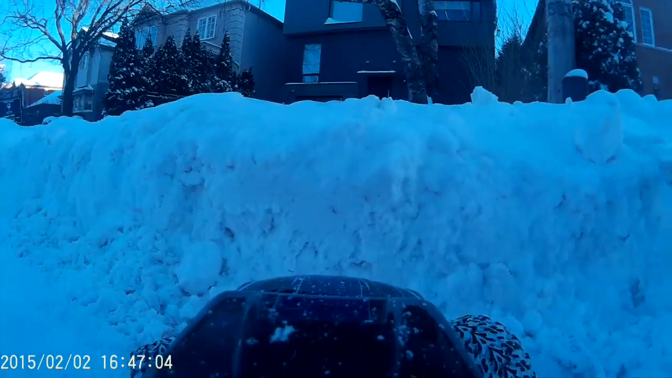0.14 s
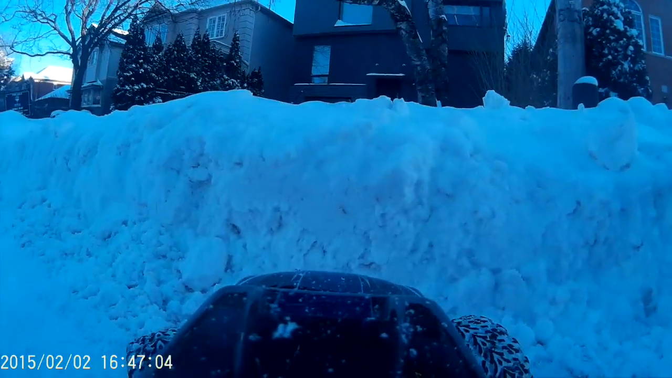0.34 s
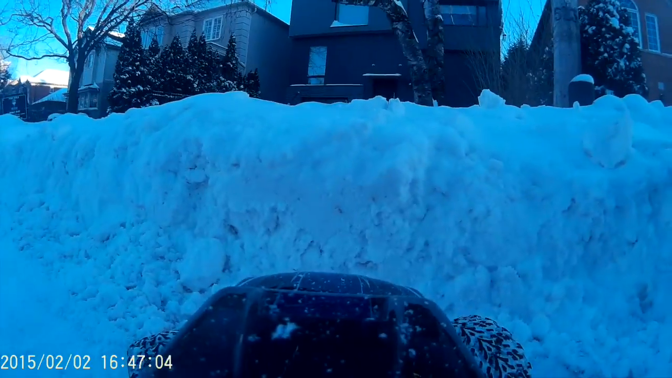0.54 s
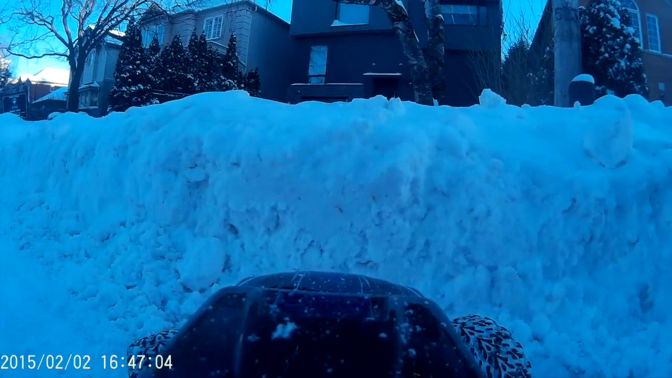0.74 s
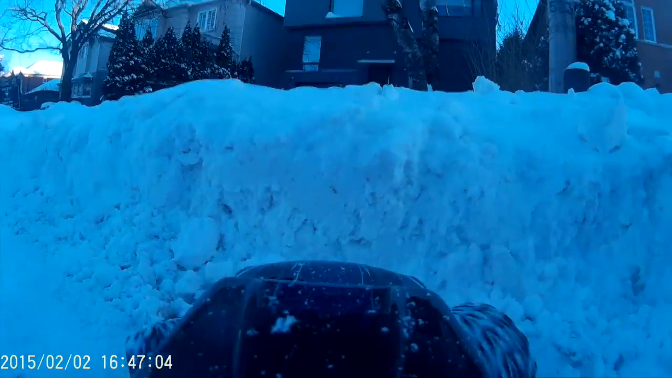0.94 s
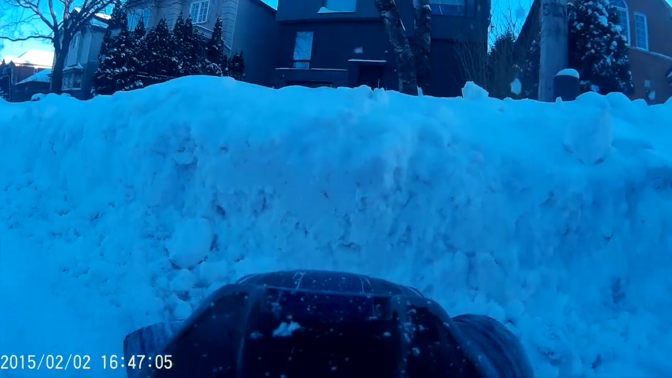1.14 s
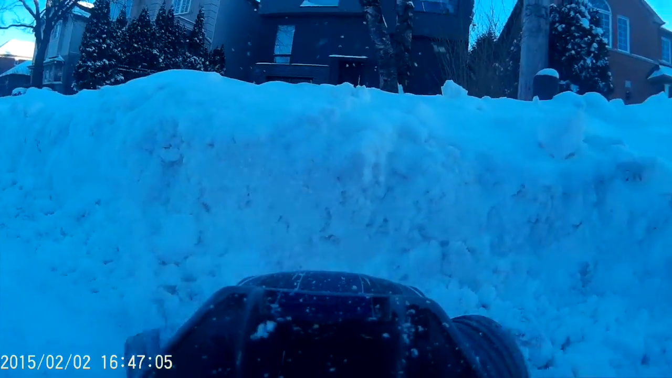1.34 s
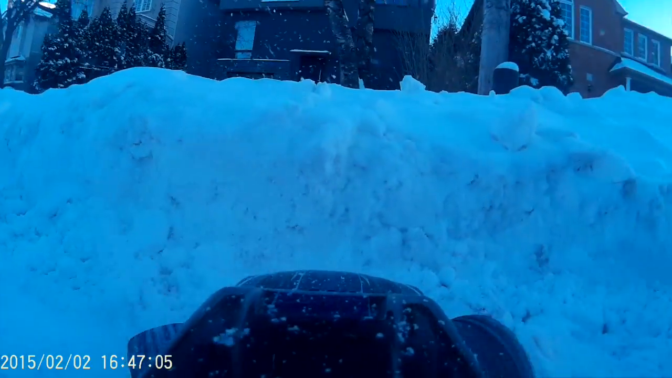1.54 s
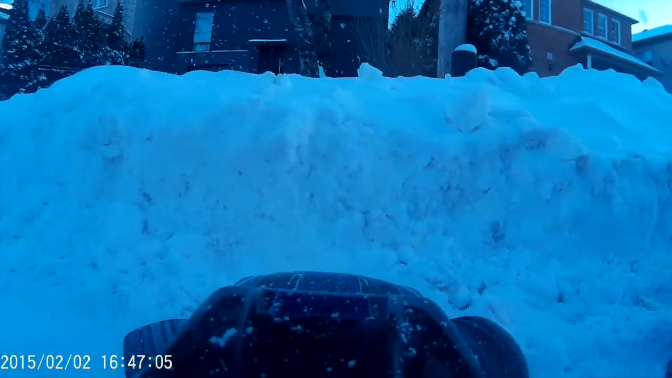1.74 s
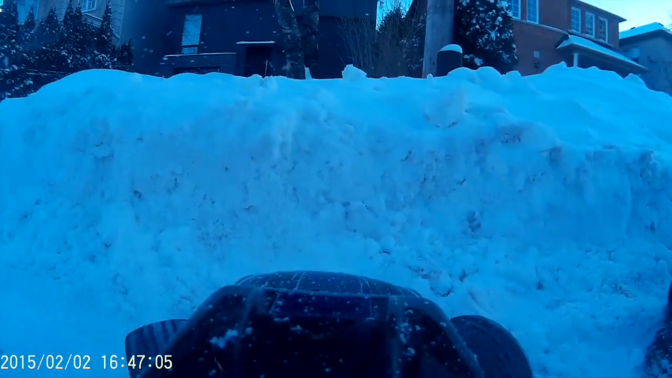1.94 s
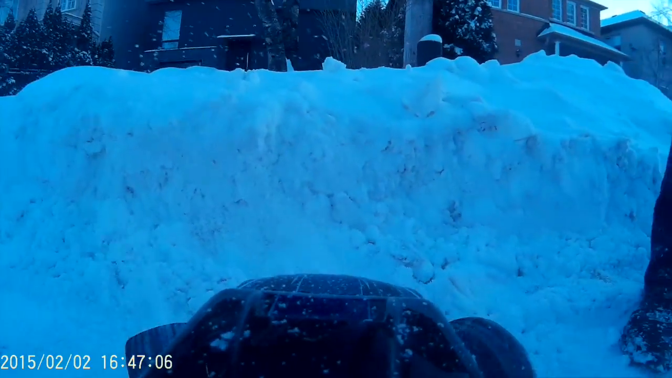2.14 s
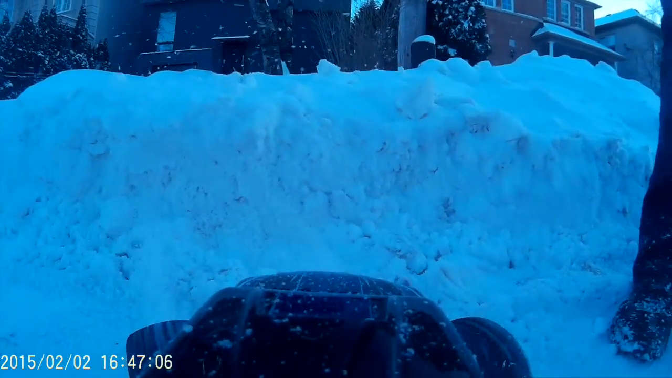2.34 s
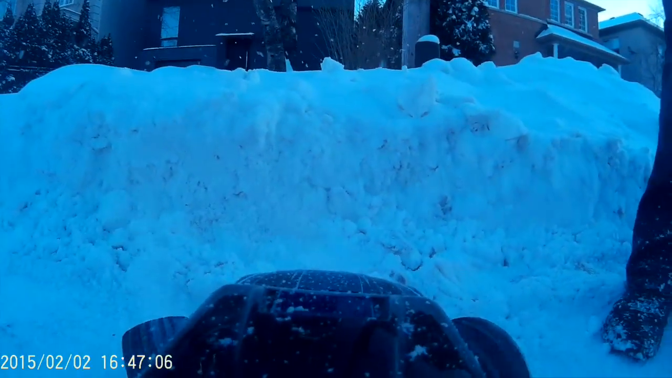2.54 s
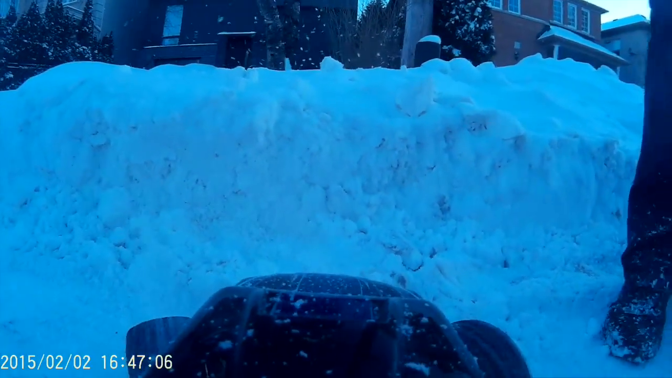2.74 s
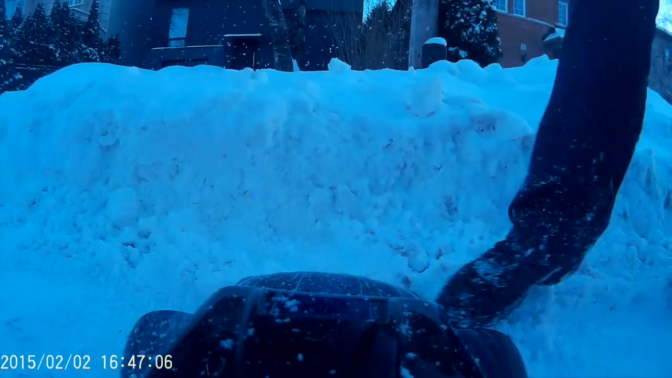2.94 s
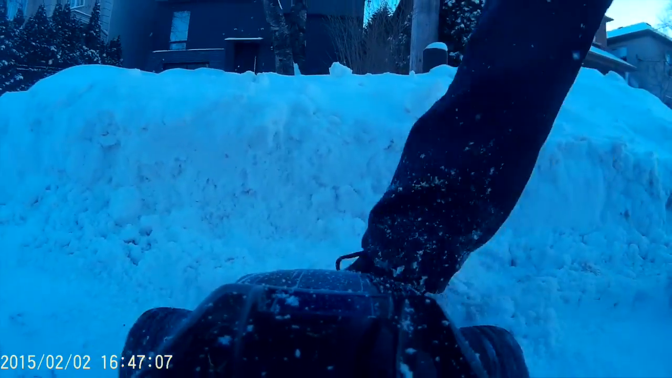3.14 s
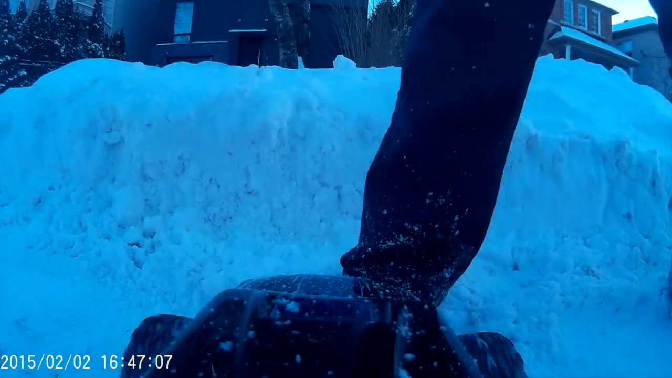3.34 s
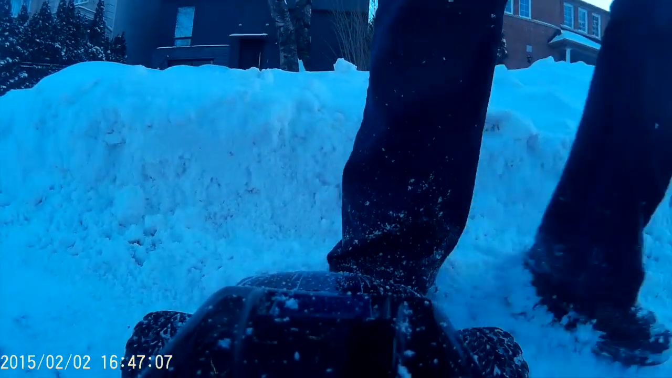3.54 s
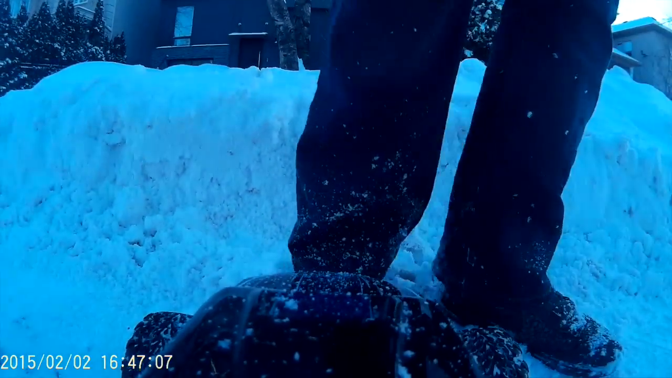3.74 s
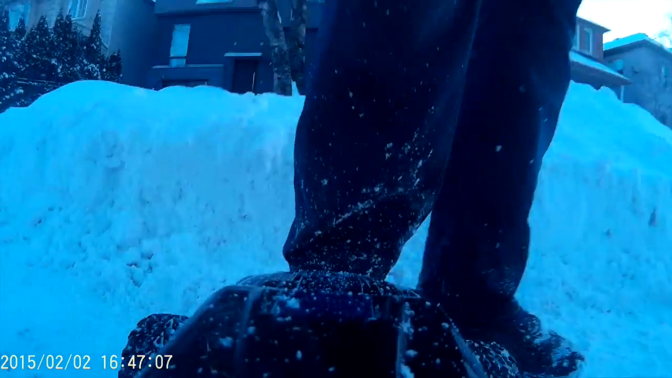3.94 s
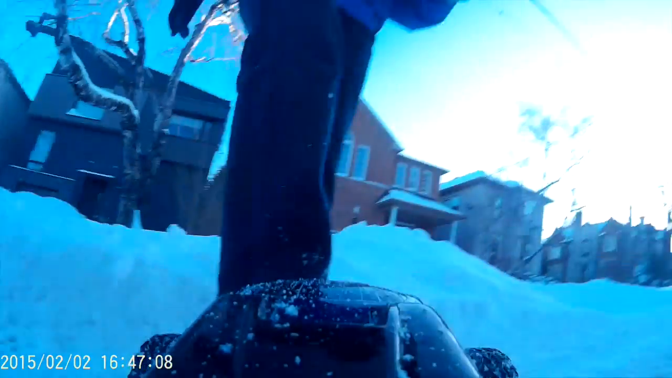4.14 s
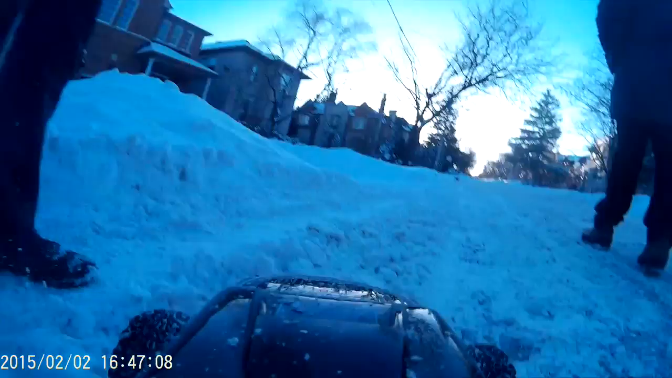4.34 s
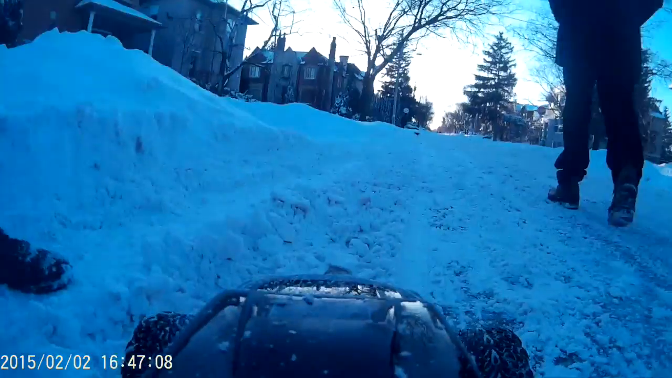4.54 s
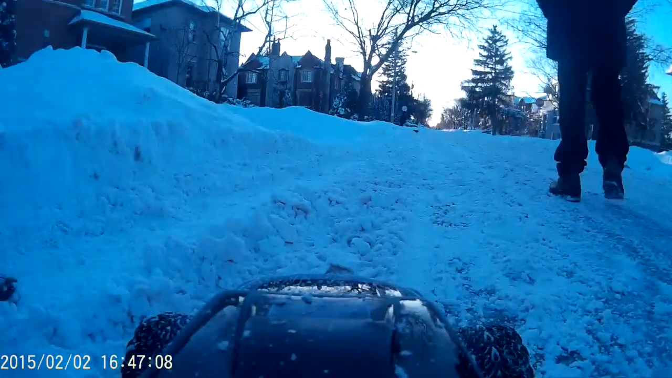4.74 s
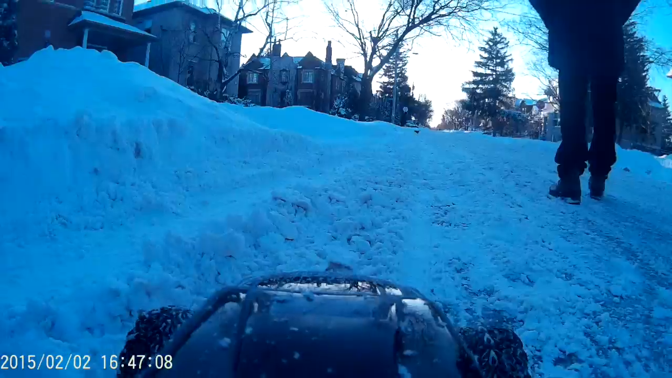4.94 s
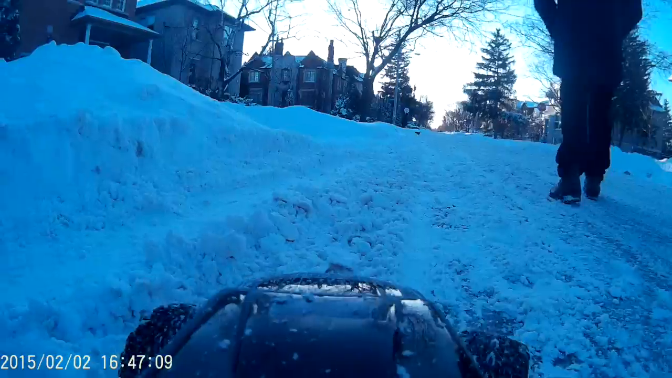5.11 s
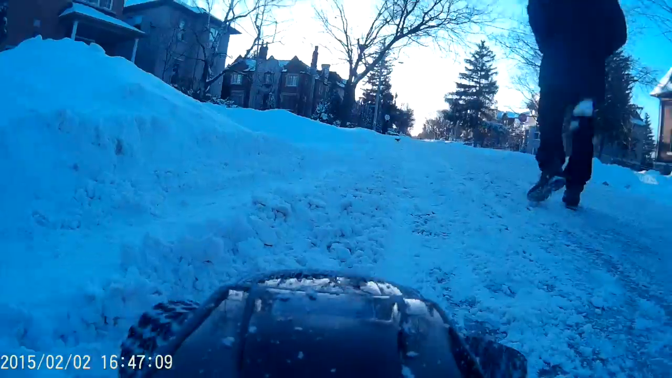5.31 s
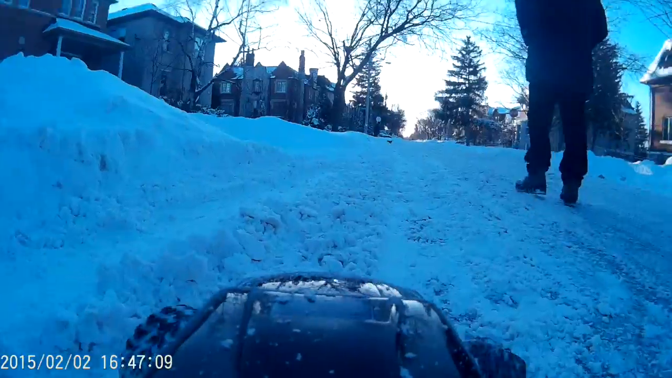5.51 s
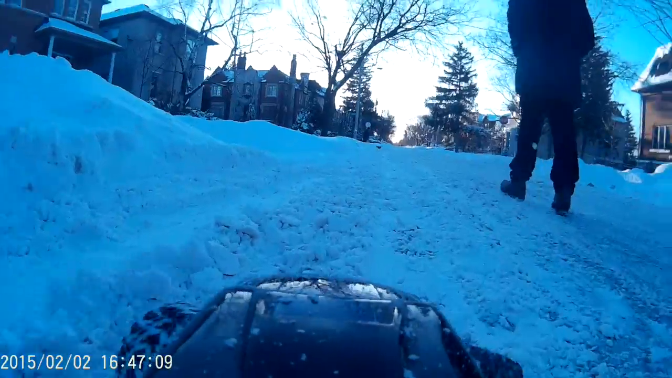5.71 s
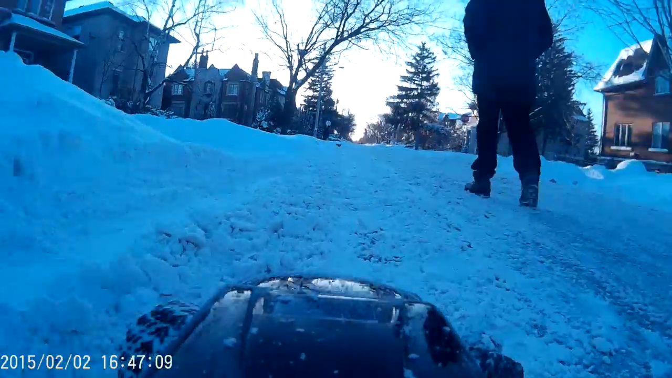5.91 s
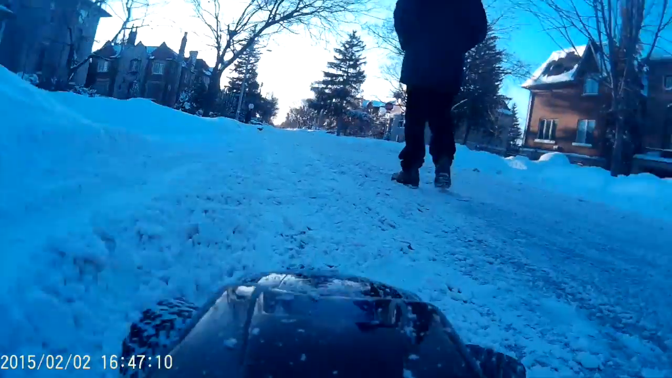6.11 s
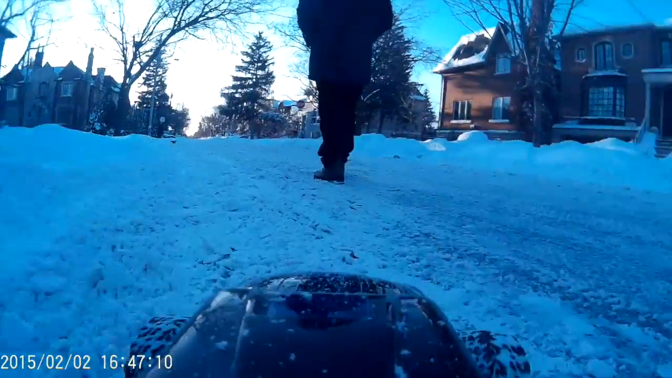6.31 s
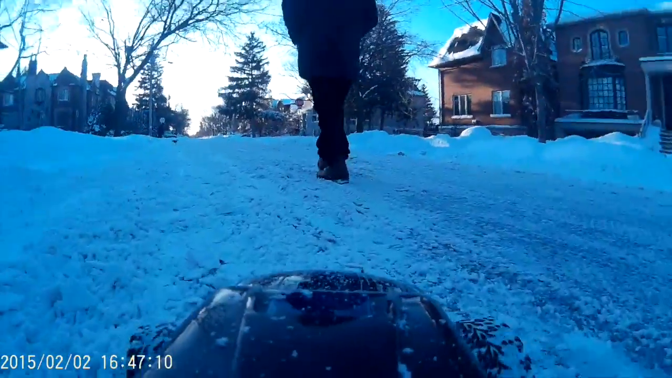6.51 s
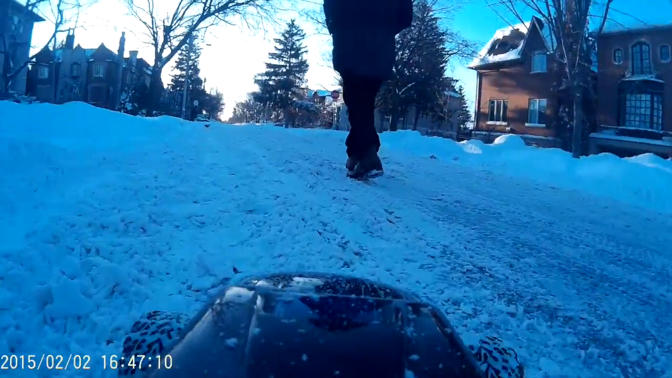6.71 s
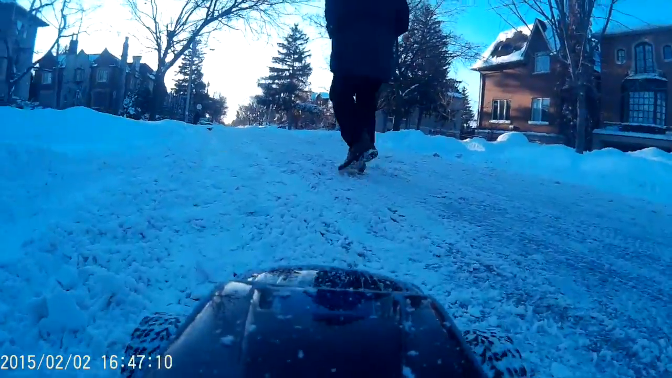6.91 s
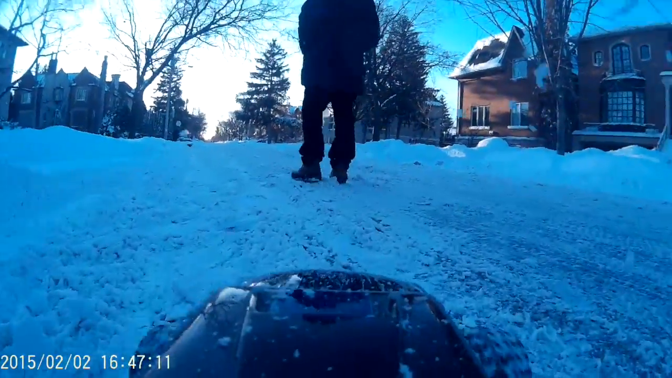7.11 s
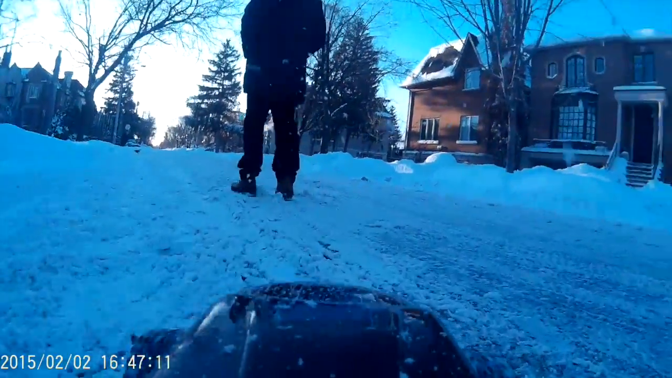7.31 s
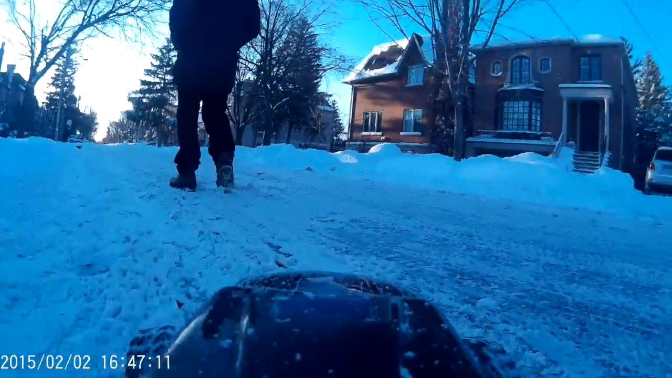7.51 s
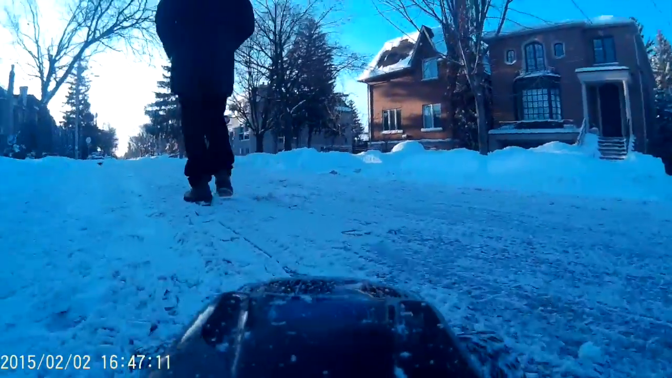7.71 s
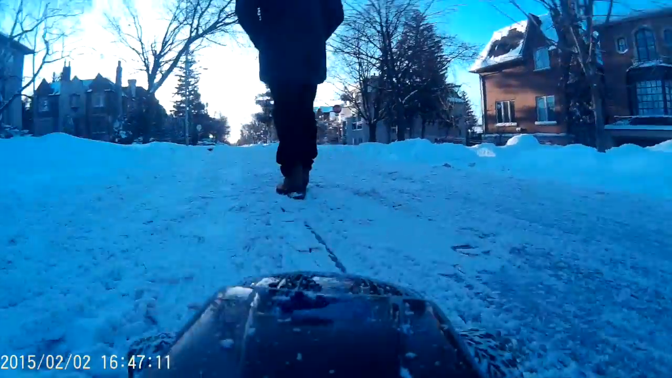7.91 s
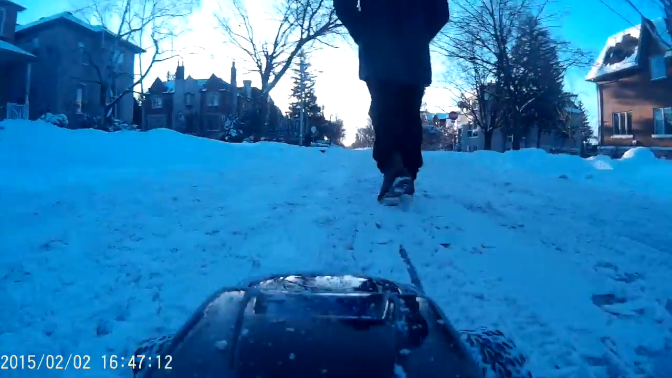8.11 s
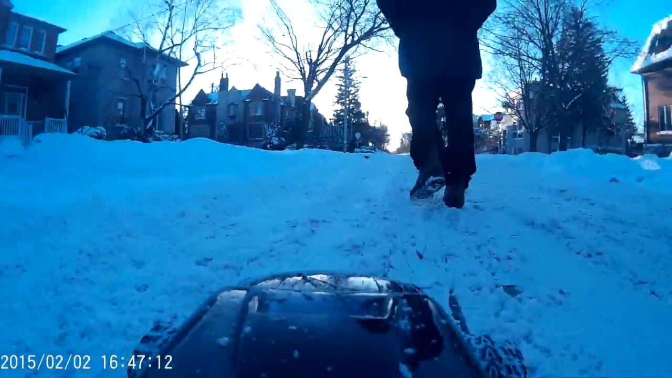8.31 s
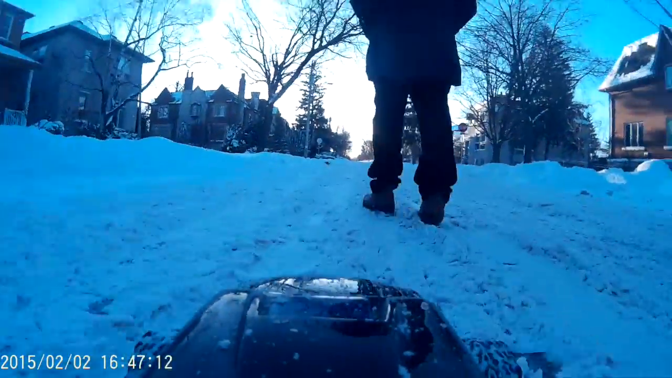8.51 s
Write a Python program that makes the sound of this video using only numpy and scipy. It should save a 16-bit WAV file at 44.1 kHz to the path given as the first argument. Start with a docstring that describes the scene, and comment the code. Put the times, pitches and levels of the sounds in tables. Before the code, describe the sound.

Close, dry plastic rattle and gear whine as a remote-control truck churns in snow, is knocked about, then drives off bumpily

```python
"""A snowy street, heard from the chassis of a small electric truck that spins its wheels,
is turned round and drives off. Random grains make tyre rumble, gear grind and spray; sines make
mesh whine and wheel hum; noisy blows make knocks, and a loose part ticks unevenly. All but the hum
and the bare stick-slip squeaks ring through resonances of the plastic shell, over faint hiss."""
import sys
import numpy as np
from scipy import signal
from scipy.io import wavfile
from scipy.ndimage import uniform_filter1d

SR = 44100
rng = np.random.default_rng(int(sys.argv[2]) if len(sys.argv) > 2 else 0)


def generate_wav(signal):
    """Clip the signal to [-1, 1] and save it as 16-bit WAV at the path in sys.argv[1]."""
    frames = np.transpose(np.atleast_2d(signal))
    scaled = np.clip(frames, -1, 1) * 32767
    pcm = np.round(scaled).astype(np.int16)
    wavfile.write(sys.argv[1], SR, pcm)


N = 377496

# ringing of the broad shell panels: (f/Hz, bandwidth/Hz, level/dB)
PANEL_MODES = [(715.2, 29.8, 2), (871.7, 44.2, 2), (990.6, 73.5, -7.5), (1463, 105, -9), (1679, 76.5, -3),
               (1856, 198, -4.5)]
# ringing of the lighter trim: (f/Hz, bandwidth/Hz, level/dB)
TRIM_MODES = [(2420, 136, 11.5), (2906, 265, 5.5), (3660, 310, 9), (4430, 320, 2), (4590, 670, -1.5)]
RUN_SPREAD_DB, CRACK_SPREAD_DB = -0.5, 3.5   # unevenness of repeated and stray knocks


def amp(db):
    """Turn decibels into an amplitude factor."""
    return 10 ** (np.asarray(db) / 20)


def rms_one(x):
    """Scale to an RMS of 1."""
    return x / np.sqrt(np.mean(x ** 2) + 1e-20)


def in_time(rows):
    """Draw straight lines between timed rows, one curve for each column after the time."""
    s, *columns = np.transpose(rows)
    return [np.interp(np.arange(N) / SR, s, column) for column in columns]


def drift(rate_hz):
    """Smooth random motion of RMS 1: noise through two equal one-pole low-passes."""
    r = np.exp(-2 * np.pi * rate_hz / SR)
    noise = rng.standard_normal(N + SR)
    settled = signal.lfilter([1], [1, -2 * r, r * r], noise)[SR:]
    return rms_one(settled)


def grains(per_s, spread_db):
    """Random clicks of uneven size."""
    size_db = spread_db * np.minimum(rng.exponential(1, N), 4)
    sizes = amp(size_db) * rng.standard_normal(N)
    return sizes * (rng.random(N) < per_s / SR)


def shell(force, modes, leak_db, edge_hz):
    """Parallel resonances with alternating signs, a little direct leak, then steep band edges."""
    out = amp(leak_db) * force
    for k, (hz, width_hz, level_db) in enumerate(modes):
        r = np.exp(-np.pi * width_hz / SR)
        b = (1 - r * r) / 2 * np.array([1, 0, -1])
        a = [1, -2 * r * np.cos(2 * np.pi * hz / SR), r * r]
        ring = signal.lfilter(b, a, force + 1e-18)
        out = out + (-1) ** k * amp(level_db) * ring
    return signal.sosfilt(signal.butter(3, edge_hz, "band", fs=SR, output="sos"), out)


def frame(force):
    """The heavy frame booms in the lows."""
    # ringing of the frame: (f/Hz, bandwidth/Hz, level/dB)
    frame_modes = [(21.7, 8.2, 1), (108, 20.4, 1), (173.8, 17.1, -4.5), (261.5, 28.8, -1.5),
                   (373.7, 23, -12.5)]
    return shell(force, frame_modes, leak_db=-15.5, edge_hz=[14, 430])


def panels(force):
    """All shell panels ring through the mids."""
    return shell(force, PANEL_MODES, leak_db=-26.5, edge_hz=[450, 2100])


def big_panels(force):
    """The three lowest panel modes ring."""
    return shell(force, PANEL_MODES[:3], leak_db=-28.5, edge_hz=[450, 1200])


def small_panels(force):
    """The upper panel modes ring."""
    return shell(force, PANEL_MODES[3:], leak_db=-40.5, edge_hz=[1200, 2100])


def trim(force):
    """The light trim rings above the panels."""
    return shell(force, TRIM_MODES, leak_db=-44, edge_hz=[2100, 5600])


def small_parts(force):
    """Small loose parts ring briefly in the treble."""
    # ringing of the small parts: (f/Hz, bandwidth/Hz, level/dB)
    tick_modes = [(7070, 430, 0.5), (9700, 6000, -9.5)]
    return shell(force, tick_modes, leak_db=-15.5, edge_hz=[5200, 12000])


def gear_levels():
    """Rumble and grind in dB: grind jumps as the gears take load and sinks when they roll free."""
    # how hard the snow shakes the tyres: (t/s, rumble level/dB)
    rumble_curve = [(0, -28), (.15, -39.5), (.42, -51), (.82, -56.5), (.87, -36.5), (1.0, -36),
                    (1.6, -24.5), (1.86, -26.5), (2.0, -31), (2.25, -24), (2.6, -28.5), (2.7, -25),
                    (3.19, -34.5), (3.86, -49), (3.9, -37), (4.31, -41), (4.4, -29), (4.62, -39),
                    (5.17, -50.5), (5.2, -26), (5.36, -41.5), (5.5, -35), (5.9, -37.5), (6.3, -34.5),
                    (6.91, -38.5), (7.3, -33.5), (7.97, -39), (8.03, -25.5), (8.25, -36), (8.56, -33.5)]
    # gears loaded by the motor or by dragging the truck: (start t/s, end t/s, grind at middling rumble/dB)
    load_spans = [(0, 0.045, -46), (0.846, 3.208, -39), (4.094, 4.215, -49.5), (4.379, 4.517, -45.5),
                  (5.185, 6.484, -42.5), (6.921, 8.56, -42.5)]
    middling_db = -33
    grind_follows, coast_follows = 0.55, 0.48   # shares of the rumble's swing, loaded and coasting
    coast_db = -57.5   # grind when rolling free, at middling rumble
    snatch_db, snatch_s = 5.5, 0.027   # slack is taken up with a jolt
    unload_db_per_s = 62   # fade once the load is off

    t, (rumble_db,) = np.arange(N) / SR, in_time(rumble_curve)
    swing_db = rumble_db - middling_db
    grind_db = coast_db + coast_follows * swing_db
    for start, end, level_db in load_spans:
        jolt_db = snatch_db * np.exp(-np.abs(t - start) / snatch_s)
        fade_db = unload_db_per_s * np.maximum(t - end, 0)
        loaded_db = level_db + grind_follows * swing_db + jolt_db - fade_db
        grind_db = np.where(t >= start, np.maximum(grind_db, loaded_db), grind_db)
    return rumble_db, uniform_filter1d(grind_db, size=600)


def shudder_db():
    """Extra shaking in dB, with soft edges."""
    # wheels spinning free set the truck shuddering: (start t/s, end t/s, strength/dB)
    shudder_spans = [(1.62, 1.828, 13.5), (2.285, 3.206, 10.5)]
    edge_s = 0.052
    t = np.arange(N) / SR
    shake_db = np.zeros(N)
    for start, end, level_db in shudder_spans:
        inside = np.minimum(t - start, end - t)
        shake_db += level_db * np.clip(inside / edge_s + .5, 0, 1)
    return shake_db


def running_gear():
    """Snow lumps shake the frame, teeth grind the panels, spray patters on trim; shared bumps move all."""
    spray_at_ref_db, grind_ref_db = -58.5, -40.5   # spray level at this grind level
    spray_follows, spray_shake = 0.93, 0.39   # shares of the grind's swing and of the shuddering
    rumble_db, grind_db = gear_levels()
    spray_db = spray_at_ref_db + spray_follows * (grind_db - grind_ref_db) + spray_shake * shudder_db()

    bumps = drift(15.5)
    lumps = grains(2500, spread_db=1.5) * amp(1.48 * bumps + 2.36 * drift(16.8))
    teeth = grains(1800, spread_db=3.0) * amp(0.92 * bumps + 1.7 * drift(43))
    snow = grains(1200, spread_db=1.5) * amp(0.68 * bumps + 2.45 * drift(54))
    rumble = amp(rumble_db) * rms_one(frame(lumps))
    grind = amp(grind_db) * rms_one(panels(teeth))
    spray = amp(spray_db) * rms_one(trim(snow))
    return rumble + grind + spray


def ticks():
    """A loose part taps at a jittered rate, unevenly hard; harder shuddering means fewer missed taps."""
    ticks_per_s = 101   # about four a turn with the wheels spinning free
    tap_db, grind_ref_db, tap_follows = -34, -37.5, 1   # gain at this grind level; share of its swing
    tap_spread_db, tap_s = 6, 0.00079   # unevenness; decay time
    chatter_db = -31   # fine chatter between the taps, before the shuddering lifts it

    shake_db, grind_db = shudder_db(), gear_levels()[1]
    beats = np.arange(1, N / SR * ticks_per_s - 1)
    jitter, hardness, miss = rng.standard_normal((len(beats), 3)).T
    at = ((beats + .12 * jitter) / ticks_per_s * SR).astype(int)
    lands = miss < shake_db[at] / 5 - .8
    lands &= grind_db[at] > -52   # no taps under a weak grind
    taps = np.zeros(N)
    taps[at] = lands * amp(tap_spread_db * np.minimum(hardness, 1.5))

    decay = signal.lfilter([.3], [1, -np.exp(-1 / (tap_s * SR))], taps + 1e-18)
    ragged = decay * rng.standard_normal(N)
    force = ragged + amp(chatter_db + shake_db) * grains(4200, spread_db=2.5)
    upper_trim = shell(force, TRIM_MODES[3:], leak_db=-28, edge_hz=[3000, 5700])
    gain_db = tap_db + tap_follows * (grind_db - grind_ref_db)
    return amp(gain_db) * (small_parts(force) + amp(15) * upper_trim)


def single_knocks():
    """Separate knocks in the drive line and shell, each with its own hardness."""
    # single knocks: (t/s, nominal peak level/dB, crack relative to the peak/dB)
    knock_rows = [(0.08, -22.5, -27), (0.259, -29.5, -24.5), (0.852, -27, -26), (0.886, -17, -22),
                  (0.979, -22, -27), (1.092, -17, -29), (1.207, -17, -29.5), (2.002, -14, -44),
                  (2.102, -25, -14), (2.661, -12, -30), (2.889, -13.5, -44), (3.135, -25, -22),
                  (3.258, -24.5, -24), (3.346, -21, -21), (3.579, -27, -26.5), (3.803, -38.5, -41),
                  (3.88, -33.5, -37), (3.899, -34, -12), (3.996, -21.5, -26), (4.063, -34, -31),
                  (4.102, -33.5, -6.5), (4.131, -24, -24), (4.155, -26, -27), (4.19, -29.5, -20),
                  (4.345, -21.5, -28.5), (4.411, -19.5, -20.5), (4.452, -21.5, -24), (4.472, -30.5, -9.5),
                  (4.519, -29, -16), (4.564, -35.5, -16), (4.602, -36, -16.5), (4.685, -47, -24),
                  (4.762, -31.5, -26), (4.852, -32.5, -26), (4.975, -29.5, -31), (5.046, -41, -23),
                  (5.193, -15, -28), (5.208, -26.5, -16.5), (5.228, -26, -22), (5.264, -25, -18),
                  (5.293, -26, -18.5), (5.324, -23.5, -20.5), (5.765, -23.5, -39), (5.957, -20.5, -27.5),
                  (6.136, -18, -32), (6.279, -14.5, -29), (6.381, -25.5, -20.5), (6.5, -18.5, -24.5),
                  (6.562, -29, -21), (6.655, -32, -34), (6.94, -21, -20.5), (6.981, -16.5, -24),
                  (7.238, -20, -22.5), (7.465, -22, -27), (7.511, -21, -30), (7.793, -18, -31.5),
                  (7.878, -20.5, -23.5), (7.933, -20, -27), (8.014, -19, -20), (8.139, -19.5, -21),
                  (8.297, -17, -28.5), (8.401, -19, -24), (8.483, -20.5, -31)]
    return list(knock_rows)


def repeated_knocks():
    """A knock comes round again and again, at even or widening gaps."""
    # knock runs: (first t/s, last t/s, knocks/count, gap growth a knock/ratio,
    #              nominal peak level/dB, loss a knock/dB, crack relative to the peak/dB)
    run_rows = [(.309, .615, 4, 1.16, -34, 3, -25), (1.604, 1.916, 9, 1.0, -11, .4, -38),
                (2.177, 2.602, 12, 1.0, -12.5, 0, -44), (3.66, 3.85, 3, 1.08, -38, .5, -28),
                (4.671, 5.113, 6, 1.06, -28.5, 0, -27), (6.725, 6.886, 3, 1.0, -28, 2, -23)]
    rows = []
    for first, last, count, growth, peak_db, loss_db, crack_db in run_rows:
        k = np.arange(round(count))
        elapsed = np.cumsum(growth ** k) - 1
        times = first + (last - first) * elapsed / elapsed[-1]
        a, b = rng.standard_normal((len(k), 2)).T
        peaks_db = peak_db - loss_db * k + RUN_SPREAD_DB * a
        rows += zip(times, peaks_db, crack_db + CRACK_SPREAD_DB * b)
    return rows


def stray_knocks():
    """Lesser knocks fall at random and follow the level of the grind."""
    strays_per_s = 14
    over_grind_db, stray_crack_db = 9, -17   # nominal peak over the grind; crack relative to the peak
    count, grind_db = round(strays_per_s * N / SR), gear_levels()[1]
    times, chance = rng.uniform(0, N / SR, count), rng.standard_normal((count, 2))
    rows = []
    for s, (a, b) in zip(times, chance):
        peak_db = grind_db[int(s * SR)] + over_grind_db + RUN_SPREAD_DB * a
        rows.append((s, peak_db, stray_crack_db + CRACK_SPREAD_DB * b))
    return rows


def knocks():
    """Sharp blows with ragged tails drive the shell; a larger crack brings out the trim and small parts."""
    s, peak_db, crack_db = np.transpose(single_knocks() + repeated_knocks() + stray_knocks())
    out, age = np.zeros(N), np.arange(2500) / SR
    # (part struck, share of the crack it takes, tail/s, blow height over the tail, gain/dB)
    parts = [(frame, .1, .012, 3.0, 22), (big_panels, -.15, .006, 25.0, -3),
             (small_panels, .4, .008, 6.0, 16), (trim, 1, .006, 4.0, 3),
             (small_parts, 1.5, .0007, 3.0, 6)]
    for part, hardness, tail_s, blow, gain_db in parts:
        force = np.zeros(N + 2500)
        pushes = rng.choice([-1, 1], (len(s), 2500)) * np.exp(-age / tail_s)
        pushes[:, 0] = blow
        levels_db = peak_db + hardness * crack_db + gain_db
        for at, level_db, push in zip((s * SR).astype(int), levels_db, pushes):
            force[at:at + 2500] += amp(level_db) * push
        out += part(force[:N])
    return out


def motor():
    """Mesh whine wavers once a turn and swells on the shell's resonances; unbalanced wheels hum."""
    # bursts of throttle, each with rows of: (t/s, gear mesh f/Hz, whine level before the shell/dB)
    throttle_bursts = [
        [(.95, 700, -50), (.99, 950, -35), (1.025, 1480, -30), (1.11, 2320, -39), (1.21, 2920, -48),
         (1.38, 3580, -49), (1.75, 3830, -43), (2.0, 3750, -44), (2.35, 3880, -47), (3.0, 3680, -54),
         (3.3, 2580, -78)],
        [(5.36, 800, -70), (5.42, 1000, -44), (5.5, 1250, -37), (5.56, 1420, -42), (5.67, 1320, -39),
         (5.8, 970, -45), (5.97, 880, -48), (6.15, 760, -48), (6.35, 650, -57)],
        [(6.95, 650, -52), (6.985, 780, -43), (7.03, 1300, -39), (7.09, 1720, -39), (7.23, 1940, -42),
         (7.42, 1810, -47), (7.6, 1380, -47), (7.76, 920, -45), (7.9, 800, -52), (8.15, 880, -45),
         (8.45, 620, -46)],
    ]
    # parts of the wheel hum: (multiple of the wheel rate, level relative to the hum gain/dB)
    hum_partials = [(1, -8.5), (2, -31.5), (3, -3), (4, 3.5), (5, -21), (6, -8.5), (7, -19), (10, -18),
                    (11, -5.5)]
    teeth_per_turn = 150   # mesh cycles for one turn of the wheels
    teeth_per_shaft_turn = 14   # the motor pinion runs slightly out of round
    octave_db = -12   # second harmonic of the mesh
    hum_db, top_mesh_hz, hum_speed_power = -41.5, 4070, 2.2   # gain at top speed, before shuddering

    whine, hum = np.zeros(N), np.zeros(N)
    t, unsteady, flutter = np.arange(N) / SR, drift(90), drift(50)
    for burst in throttle_bursts:
        mesh_hz, whine_db = in_time(burst)
        on = (t > burst[0][0]) & (t < burst[-1][0])
        mesh_hz = uniform_filter1d(mesh_hz, size=1200)
        turns = 2 * np.pi * np.cumsum(mesh_hz) / SR / teeth_per_turn
        wavering_hz = mesh_hz * (1 + .015 * np.sin(turns) + 0.03 * unsteady)
        mesh = 2 * np.pi * np.cumsum(wavering_hz) / SR
        shaft_swell = 1 + .7 * np.sin(mesh / teeth_per_shaft_turn)
        tone = np.sin(mesh) + amp(octave_db) * np.sin(2 * mesh)
        whine += on * amp(whine_db + 5.5 * flutter) * shaft_swell * tone

        speed_gain = (mesh_hz / top_mesh_hz) ** hum_speed_power
        starts = rng.uniform(0, 2 * np.pi, len(hum_partials))
        for (k, level_db), start in zip(hum_partials, starts):
            hum += on * speed_gain * amp(level_db) * np.sin(k * turns + start)
    ringing_whine = amp(6.5) * panels(whine) + amp(-16) * trim(whine)
    return ringing_whine + amp(hum_db + shudder_db()) * hum


def squeaks():
    """Rubbing plastic gives brief stick-slip tones; the octave is stronger where it meets the trim's ring."""
    # squeaks: (t/s, f/Hz, level of the fundamental/dB, length between the 1/e points/s)
    squeak_rows = [(2.968, 1960, -28.5, 0.0091), (3.017, 1900, -26.5, 0.0066), (5.294, 1920, -26, 0.0078),
                   (6.449, 1900, -32, 0.0095), (6.5, 1415, -32, 0.0047), (6.942, 1304, -28, 0.0075)]
    out, t = np.zeros(N), np.arange(N) / SR
    for s, hz, level_db, length_s in squeak_rows:
        near = slice(round((s - .08) * SR), round((s + .08) * SR))
        phase = 2 * np.pi * hz * t[near]
        swell = np.exp(-(2 * (t[near] - s) / length_s) ** 2)
        octave_db = -21.5 + 7.4 * (hz > 1800)
        out[near] += amp(level_db) * swell * (np.sin(phase) + amp(octave_db) * np.sin(2 * phase))
    return out


def scene():
    """Sum all the sounds of the truck into one channel."""
    return (running_gear() + ticks() + knocks() + motor() + squeaks())[None]


def record(dry):
    """Faint preamp hiss, then the top is cut."""
    hiss_db, hiss_hz, cutoff_hz = -75.5, 3000, 14500   # gain on the hiss; its high-pass; top cut
    high_pass = signal.butter(1, hiss_hz, "high", fs=SR, output="sos")
    hiss = signal.sosfilt(high_pass, rng.standard_normal(dry.shape))
    top_cut = signal.cheby2(16, 40, cutoff_hz, fs=SR, output="sos")
    return signal.sosfilt(top_cut, dry + amp(hiss_db) * hiss)


dry = scene()
out = record(dry)
generate_wav(out)
```